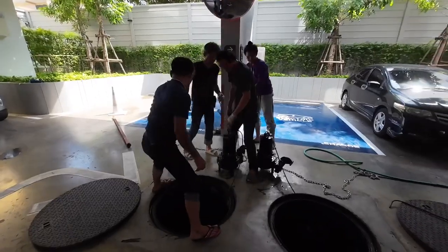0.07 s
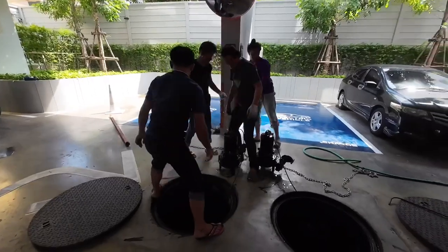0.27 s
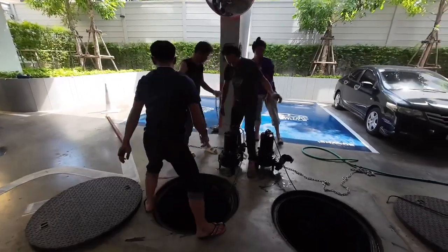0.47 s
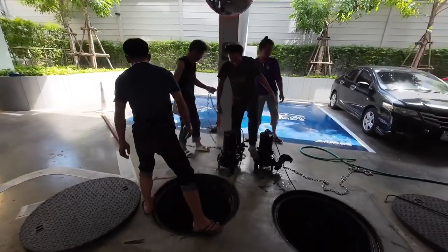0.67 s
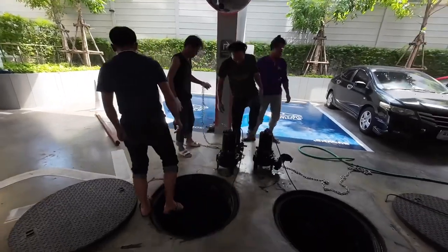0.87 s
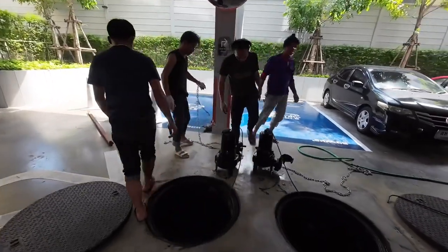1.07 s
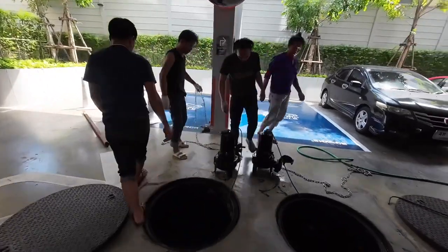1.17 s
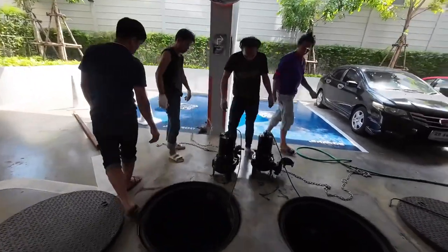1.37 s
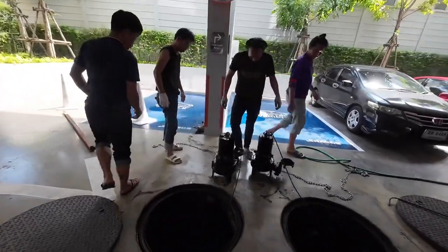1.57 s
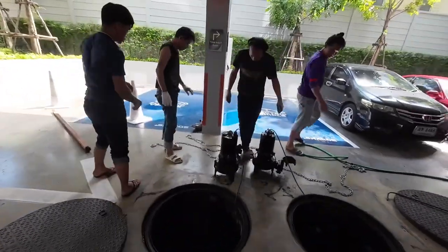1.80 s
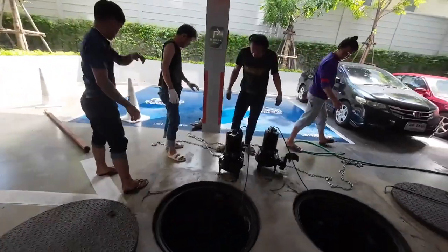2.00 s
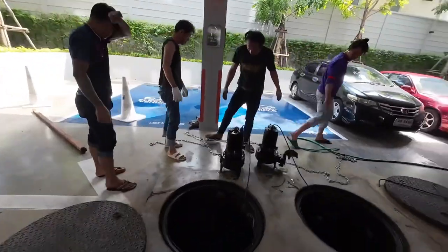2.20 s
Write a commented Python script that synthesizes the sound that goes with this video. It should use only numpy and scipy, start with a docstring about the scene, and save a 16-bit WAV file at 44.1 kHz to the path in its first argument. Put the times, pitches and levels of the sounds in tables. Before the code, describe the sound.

Steel chains jingle and scrape on concrete from the start, with a hook clinking in the first 0.2 seconds. They thin to faint clinks after 0.6 seconds. A sandal slaps at 1.3. From 1.5 to 1.7 a heavy pump lands with loud metallic knocks and thuds as the chains rattle again. Soles scuff, and smaller knocks follow near 2.2. A short garage echo and low outdoor rumble lie underneath.

```python
"""In an open garage, steel chains are dragged and dropped on the concrete floor.
Their links jingle at a few shared pitches, grind over the floor and snap down on it. A hook clinks,
and a pump is set down in a run of hard knocks that ring its casing. Feet and pump land with dull
thuds; sandals scuff over grit and slap on pockets of air. Floor and ceiling add a short echo,
and a low outdoor rumble lies under it all."""
import sys
import numpy as np
from scipy import signal
from scipy.fft import rfft, irfft
from scipy.io import wavfile
from scipy.ndimage import uniform_filter1d

SR = 44100
rng = np.random.default_rng(int(sys.argv[2]) if len(sys.argv) > 2 else 0)


def inscribe(sig):
    """Save sig as 16-bit PCM at rate SR to the path in sys.argv[1].

    A 1-D sig is mono; a 2-D sig holds one channel per row.
    Samples are clipped to [-1, 1] before scaling.
    """
    pcm = np.round(np.clip(np.atleast_2d(sig).T, -1, 1) * 32767)
    wavfile.write(sys.argv[1], SR, pcm.astype(np.int16))


N = 99048
TIME, HZ = np.arange(N) / SR, np.arange(N + 1) * SR / (2 * N)

# tone of the outdoor rumble: frequency_hz, level_db
RUMBLE_TONE = [(12, -49), (22, 2), (80, -7), (157, -4.5), (235, -8), (400, -13.5), (570, -23.5),
               (1020, -26.5), (4700, -36), (12000, -46.5), (15600, -88)]
# how loud the chain's high jingle and grinding are: time_s, level_db
JINGLE_LEVEL = [(0.0, -45.5), (0.08, -48), (0.16, -28.5), (0.34, -26), (0.39, -23), (0.64, -40.5),
                (0.69, -49), (0.7, -40), (.92, -43), (1.0, -51.5), (1.11, -54), (1.14, -46), (1.29, -62),
                (1.3, -49), (1.37, -74), (1.39, -37.5), (1.5, -20), (1.64, -19), (1.69, -31), (1.84, -23),
                (1.93, -37), (2.07, -37.5), (2.11, -27.5), (2.19, -28), (2.21, -21.5), (2.25, -36.5)]
# how loud the links' lower notes are: time_s, level_db
LOW_RING_LEVEL = [(0.04, -54), (0.22, -35), (0.71, -50.5), (0.91, -43), (1.1, -62), (1.46, -57),
                  (1.47, -26), (1.54, -23.5), (1.72, -36.5), (1.79, -29), (1.93, -41.5), (2.08, -49.5),
                  (2.12, -33), (2.25, -35)]
# the links' lower notes: pitch_hz, level_db, fade_s (time to fall 60 dB), spread_hz
LOW_LINK_NOTES = [(4760, 6.5, 0.18, 28), (4987, 14, 0.14, 53)]
# the links' high notes: pitch_hz, level_db, fade_s, spread_hz
HIGH_LINK_NOTES = [(12930, -2, .08, 85), (13380, 0, .08, 90), (13740, 0, .08, 70), (14670, -1, .08, 90)]
# tone of links grinding on concrete: frequency_hz, level_db
GRIT_TONE = [(300, 6.5), (1500, -7.5), (2600, -3), (4200, -5), (5600, 0), (8500, -4), (10500, 4.5),
             (12200, -1), (15500, 0)]
# the hook clinks: start_s, level_db
HOOK_CLINKS = [(0.037, -45), (.05, -47), (.068, -34), (0.092, -38), (.104, -30), (.110, -32.5),
               (.139, -35.5), (.153, -32), (0.162, -37), (.176, -33.5), (.183, -29.5), (.810, -36),
               (0.836, -39.5)]
# notes of the hook: pitch_hz, level_db, fade_s
HOOK_NOTES = [(1500, -12, 0.051), (2296, -10, .03), (2673, -5, 0.036), (2886, -3.5, 0.036),
              (3670, -6, 0.042)]
# tone of the rasp in each clink: frequency_hz, level_db
RASP_TONE = [(600, -9.5), (1500, -9), (2700, 2.5), (3800, -10), (5000, -17), (15000, -14)]
# single links snap against the floor: start_s, level_db
LINK_SNAPS = [(0.102, -35), (0.154, -24.5), (0.173, -24.5), (0.383, -25.5), (0.7, -32.5), (0.808, -41),
              (0.825, -36.5), (.886, -38.5), (1.052, -44.5), (1.123, -43), (1.142, -47), (1.19, -47),
              (1.299, -47), (2.099, -31)]
# tone of a snap: frequency_hz, level_db
SNAP_TONE = [(500, -22), (2500, -5.5), (7000, 2.5), (12300, 0.5), (13300, 2), (15500, -11)]
# loose links ring out: start_s, level_db, pitch_hz, fade_s
LINK_PINGS = [(.139, -36, 6402, .38), (.205, -34, 4880, 0.26), (.25, -29, 4940, 0.24),
              (.538, -41, 4800, 0.17), (.740, -37, 4830, 0.16), (.797, -40.5, 4970, 0.33),
              (.832, -37.5, 5086, 0.22), (.906, -35.5, 4823, 0.076), (.938, -39, 4860, 0.33),
              (1.473, -32, 5080, .18), (1.526, -24.5, 4980, 0.17), (1.556, -25.5, 4803, 0.39),
              (1.780, -24, 5030, 0.21), (1.868, -32.5, 5020, 0.21), (2.104, -28, 4900, 0.26)]
# feet and pump land: start_s, level_db, lean_left_db
LANDINGS = [(0.154, -31, 3), (.238, -25, 6), (0.353, -32, 12.5), (.925, -29.5, 9.5), (1.463, -22.5, 0.5),
            (1.502, -17, -3), (1.539, -10, 3), (1.609, -16.5, -0.5), (2.111, -33.5, 3), (2.197, -21.5, -8)]
# tone of a thud: frequency_hz, level_db
THUD_TONE = [(15, -6), (35, 5), (60, -7), (130, -14), (260, -25.5), (500, -31.5), (2000, -84)]
# soles slide: start_s, length_s, level_db, width (0 to 1)
SOLE_SCUFFS = [(0.384, 0.014, -38, 1), (0.521, 0.014, -46.5, 1), (1.366, 0.084, -46, 0),
               (1.907, 0.45, -41, 0)]
# tone of a scuff: frequency_hz, level_db
SCUFF_TONE = [(200, -2.5), (2500, 3.5), (3600, -2), (5000, -25), (12000, -20)]
# a sandal slaps: start_s, level_db, air_pocket_hz
SANDAL_SLAPS = [(1.335, -35.5, 2350), (1.344, -28.5, 1230), (1.3574, -29, 625)]
# tone of a slap: frequency_hz, level_db
SLAP_TONE = [(200, -6), (620, 7.5), (1100, 2), (2500, 1), (4200, -11.5), (6000, -4.5), (13000, -21)]
# the pump and its chain knock on the floor: start_s, level_db, pitch_hz
PUMP_KNOCKS = [(1.462, -21.5, 2380), (1.502, -10.5, 860), (1.508, -9.5, 830), (1.516, -18, 2330),
               (1.523, -18.5, 2580), (1.540, -11, 2520), (1.5473, -10, 2670), (1.5744, -11.5, 1060),
               (1.5783, -26, 2360), (1.585, -8, 1090), (1.61, -8, 4400), (1.614, -10.5, 2500),
               (1.6255, -6, 4310), (1.630, -6.5, 3335), (1.633, -7.5, 1740), (1.637, -5, 4400),
               (1.6424, -6.5, 1760), (1.647, -10.5, 2000), (1.654, -6.5, 2390), (1.661, -10, 1600),
               (1.669, -18, 1290), (1.711, -21, 770), (1.8, -24, 1010), (2.118, -23.5, 1110),
               (2.200, -15, 1330), (2.212, -22.5, 1660)]
# tone of a knock: frequency_hz, level_db
KNOCK_TONE = [(100, 3), (380, 1.5), (1100, -3), (2500, -1), (3500, -2.5), (6500, -2), (11000, -2),
              (15500, 1.5)]
# notes of the pump's casing: pitch_hz, level_db, fade_s
CASING_NOTES = [(389.5, 4.5, 0.076), (821, 0, 0.1), (1590, 0, 0.055), (1920, -14, 0.046), (2380, 2, 0.04),
                (2493, -3, 0.064), (3800, -9, 0.032), (4400, 2, 0.032), (6160, 1, 0.037)]
# how alike the two ears hear a sound: frequency_hz, likeness (0 to 1)
EAR_LIKENESS = [(40, .7), (150, .6), (500, .7), (1300, .9), (2500, .72), (5000, .6), (13000, .52)]

HIGH_TOUCHES_PER_S, LOW_TOUCHES_PER_S, GRIT_PER_S, CRUNCH_PER_S = 670, 220, 3000, 3500
JINGLE_DB, LOW_RING_DB, GRIT_DB, SNAP_RING_DB = -3, -3.5, -4, -8
RUMBLE_DB, RASP_DB, CASING_DB, CRUMBLE_DB = -40, -7.5, -28, -13
GARAGE_FADE_S, GARAGE_DB, GARAGE_EDGE_HZ = 0.38, -16, 11000
CUTOFF_HZ = 15750


def from_db(db):
    """Turn decibels into a number to multiply by."""
    return 10 ** (np.asarray(db) / 20)


def unit_power(x):
    """Scale a signal to an average power of 1."""
    return x / np.sqrt(np.mean(x ** 2) + 1e-20)


def in_time(rows):
    """Read a level table at every sample."""
    return np.interp(TIME, *np.transpose(rows))


def at_hz(rows):
    """Read a frequency table at every frequency."""
    hz, value = np.transpose(rows)
    return np.interp(np.log(HZ + 1), np.log(hz), value)


def colour(x, tone):
    """Filter a sound to give it the tone in a table."""
    cepstrum = irfft(np.log(unit_power(from_db(at_hz(tone)))))
    cepstrum[1:N] *= 2  # folded so that the filter never sounds ahead of a hit
    cepstrum[N + 1:] = 0
    return irfft(rfft(x, 2 * N) * np.exp(rfft(cepstrum)))[..., :N]


def stereo(pair, width=1):
    """Mix two signals into left and right: one is shared, the other sets the ears apart."""
    alike = np.clip(at_hz(EAR_LIKENESS), 0, 1)
    mid, side = rfft(pair, 2 * N)
    shared = np.sqrt((1 + alike) / 2) * mid
    apart = width * np.sqrt((1 - alike) / 2) * side
    return irfft(shared + apart * [[1], [-1]])[:, :N]


def lean_left(x, db):
    """Turn the left ear up and the right ear down."""
    return x * from_db([[db], [-db]])


def narrow_lows(x, below_hz=6500):
    """Leave only the treble spread between the ears."""
    side = signal.sosfilt(signal.butter(2, below_hz, "high", fs=SR, output="sos"), (x[0] - x[1]) / 2)
    return x.mean(axis=0) + side * np.array([[1], [-1]])


def soften(x, hz):
    """Gently turn down everything above hz."""
    return signal.sosfilt(signal.butter(1, min(hz, 20000), fs=SR, output="sos"), x + 1e-18)


def ring(clicks, hz, fade_s):
    """Each click starts a pure note that dies away."""
    decay, turn = from_db(-60 / (fade_s * SR)), 2 * np.pi * hz / SR
    return signal.lfilter([0, np.sin(turn)], [1, -2 * decay * np.cos(turn), decay ** 2], clicks + 1e-18)


def grains(per_s, spread_db):
    """Tiny touches come at random times, with uneven strength."""
    sizes = from_db(spread_db * np.minimum(rng.exponential(1, N), 4)) * rng.choice([-1, 1], N)
    return sizes * (rng.random(N) < per_s / SR)


def burst(start_s, db, fade_s, crack):
    """A hit makes a sharp crack, then a dying crunch of tiny impacts."""
    age, chance = np.maximum(TIME - start_s, 0), CRUNCH_PER_S / SR
    impacts = rng.standard_normal((2, N)) * (rng.random(N) < chance) / np.sqrt(chance)
    crunch = impacts * (TIME >= start_s) * from_db(-60 * np.minimum(age / fade_s, 4))
    crunch[0, int(start_s * SR)] -= crack
    return from_db(db) * crunch


def struck(hits, notes, uneven_db, bounce_s):
    """Each blow and its two quick bounces ring every note of an object, some harder than others."""
    start_s, db = np.transpose(hits)[:2]
    bounce = np.arange(3)
    delay_s = bounce_s * bounce * rng.uniform(0.612, 1.5, (len(hits), 3))
    at = ((start_s[:, None] + delay_s) * SR).astype(int)
    out = np.zeros((2, N))
    for hz, note_db, fade_s, *_ in notes:
        clicks, shape = np.zeros((2, N)), (2, *at.shape)
        strength = from_db(db[:, None] + note_db + uneven_db * rng.standard_normal(shape))
        clicks[:, at] = strength * rng.choice([-1, 1], shape) / np.sqrt(1 + bounce)
        out += ring(clicks, hz, fade_s)
    return out


def rumble():
    """A steady, deep noise comes in from outdoors."""
    return from_db(RUMBLE_DB) * stereo(colour(rng.standard_normal((2, N)), RUMBLE_TONE), width=0.18)


def links(notes, level_db, per_s, count=12):
    """Random touches ring links that each have a slightly different pitch and their own place."""
    touches, touched_link = grains(per_s, spread_db=4), rng.integers(0, count, N)
    rank = (np.arange(count) + .5) / count
    offsets = np.log(rank / (1 - rank)) / 2  # most links lie near the middle pitch
    out = np.zeros((2, N))
    for hz, db, fade_s, spread_hz in notes:
        for link, offset in enumerate(rng.permutation(offsets)):
            note = from_db(db) * ring(touches * (touched_link == link), hz + spread_hz * offset, fade_s)
            side = .55 * rng.standard_normal()
            out += note * np.array([[1 + side], [1 - side]]) / np.hypot(1, side)
    own_level = np.sqrt(uniform_filter1d(np.mean(out ** 2, 0), size=3000) + 1e-9)
    return from_db(level_db) * out / own_level


def chain():
    """Links ring against each other, grind over the concrete and snap down on it."""
    swell_db = in_time(JINGLE_LEVEL)
    jingle = links(HIGH_LINK_NOTES, swell_db + JINGLE_DB, HIGH_TOUCHES_PER_S)
    low_ring = links(LOW_LINK_NOTES, in_time(LOW_RING_LEVEL) + LOW_RING_DB, LOW_TOUCHES_PER_S)
    low_ring = lean_left(low_ring + pings(), db=2)
    return jingle + low_ring + narrow_lows(stereo(grinding(swell_db) + snaps()))


def grinding(swell_db):
    """Links scrape over grit, swelling a little less than the jingle does."""
    grit = unit_power(np.array([grains(GRIT_PER_S, spread_db=0.5) for _ in range(2)]))
    level_db = GRIT_DB + swell_db.mean() + 0.89 * (swell_db - swell_db.mean())
    return colour(grit * from_db(level_db), GRIT_TONE)


def hook():
    """A hook clinks and rasps against the pump."""
    clinks = struck(HOOK_CLINKS, HOOK_NOTES, uneven_db=2, bounce_s=.0025)
    rasp = sum(burst(start_s, db + RASP_DB, fade_s=0.096, crack=2.9) for start_s, db in HOOK_CLINKS)
    return stereo(clinks + colour(rasp, RASP_TONE), width=0.038)


def snaps():
    """Single links crack against the floor and ring at their high notes."""
    cracks = sum(burst(start_s, db, fade_s=0.055, crack=5) for start_s, db in LINK_SNAPS)
    ringing = struck(LINK_SNAPS, HIGH_LINK_NOTES, uneven_db=2, bounce_s=.003)
    return colour(cracks, SNAP_TONE) + from_db(SNAP_RING_DB) * ringing


def pings():
    """Single links swing free and ring cleanly."""
    return sum(ring(from_db(db) * (np.arange(N) == int(start_s * SR)), hz, fade_s)
               for start_s, db, hz, fade_s in LINK_PINGS)


def thuds():
    """The weight of feet and pump lands with dull thuds."""
    out = np.zeros((2, N))
    for start_s, db, left_db in LANDINGS:
        impact = burst(start_s, db, fade_s=0.17, crack=15.5)
        out += lean_left(stereo(impact, width=.9), left_db)
    return colour(out, THUD_TONE)


def scuffs(rise_s=0.0018, fall_s=0.012):
    """Soles slide over gritty concrete."""
    out = np.zeros((2, N))
    for start_s, length_s, db, width in SOLE_SCUFFS:
        rise = np.clip((TIME - start_s) / rise_s, 0, 1)
        fall = np.exp(-np.maximum(TIME - start_s - length_s, 0) / fall_s)
        out += from_db(db) * rise * fall * rng.standard_normal((2, N)) * [[1], [width]]
    return stereo(colour(out, SCUFF_TONE))


def slaps():
    """A sole claps down; the pocket of air under it gives a hollow note."""
    out = np.zeros(N)
    for start_s, db, pocket_hz in SANDAL_SLAPS:
        clap = burst(start_s, db, fade_s=0.13, crack=20)[0]
        hollow = signal.lfilter(*signal.iirpeak(pocket_hz, Q=3.2, fs=SR), clap + 1e-18)
        out += hollow + from_db(-9) * clap
    return colour(out, SLAP_TONE)


def knock(start_s, db, hz):
    """Iron cracks on concrete and grit crumbles under it; the spot that hits rings briefly."""
    crunch = burst(start_s, db, fade_s=0.016, crack=5.5)
    crunch += burst(start_s, db + CRUMBLE_DB, fade_s=.065, crack=0)
    return soften(crunch, 1.12 * hz) + 0.098 * ring(crunch, hz, fade_s=0.0097)


def pump():
    """The pump rocks and knocks on the floor, and each knock rings its casing."""
    knocks = colour(sum(knock(*row) for row in PUMP_KNOCKS), KNOCK_TONE)
    casing = from_db(CASING_DB) * struck(PUMP_KNOCKS, CASING_NOTES, uneven_db=3, bounce_s=.002)
    return lean_left(stereo(knocks + casing, width=.85), db=1.1)


def garage_echo(x, delay_s=.008):
    """Floor and ceiling throw back a soft, blurred echo."""
    noise = soften(rng.standard_normal((2, N)), GARAGE_EDGE_HZ)
    tail = noise * from_db(-60 * TIME / GARAGE_FADE_S) * (TIME > delay_s)
    return from_db(GARAGE_DB) * signal.fftconvolve(x, unit_power(tail) / np.sqrt(N), axes=1)[:, :N]


def scene():
    """All the sounds in the garage and their echo, over the outdoor rumble."""
    work = pump() + hook() + slaps() + thuds() + scuffs() + chain()
    return rumble() + work + narrow_lows(garage_echo(work))


def record(dry):
    """Turn down the deepest bass, round off the peaks and cut the highest treble."""
    trimmed = signal.sosfilt(signal.butter(1, 14, "high", fs=SR, output="sos"), dry)
    rounded = .9 * np.tanh(trimmed / .9)
    return irfft(rfft(rounded, 2 * N) / np.sqrt(1 + (HZ / CUTOFF_HZ) ** 900))[:, :N]


dry = scene()
out = record(dry)
inscribe(out)
```